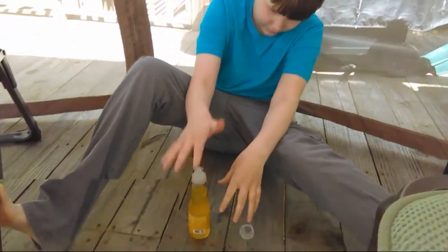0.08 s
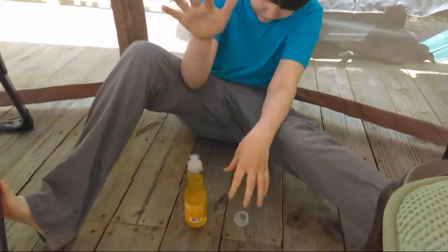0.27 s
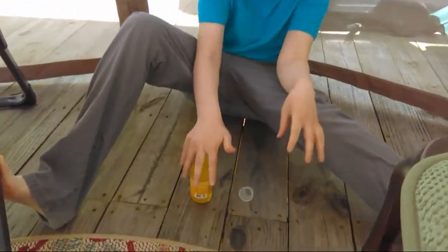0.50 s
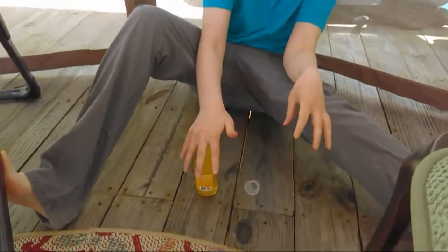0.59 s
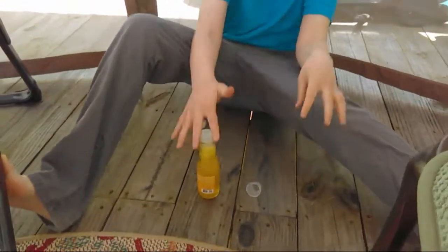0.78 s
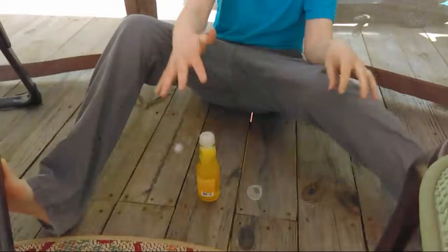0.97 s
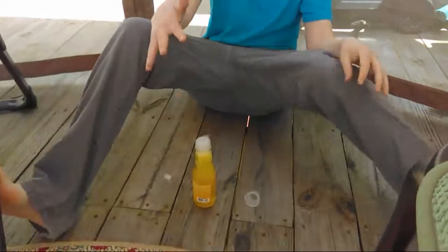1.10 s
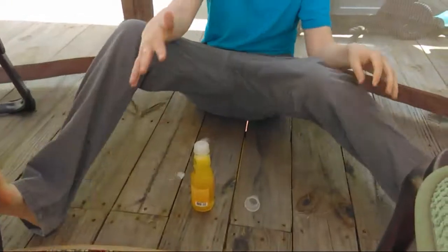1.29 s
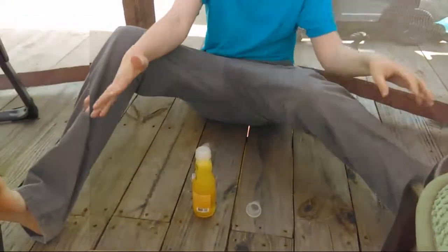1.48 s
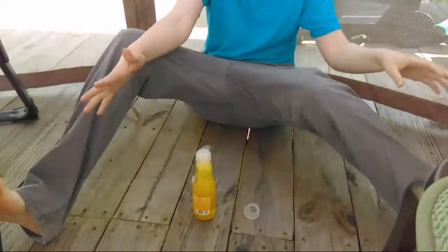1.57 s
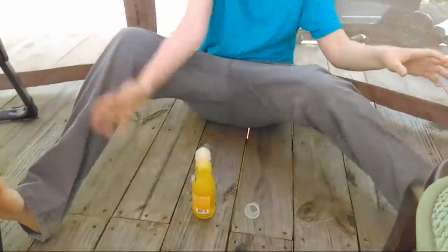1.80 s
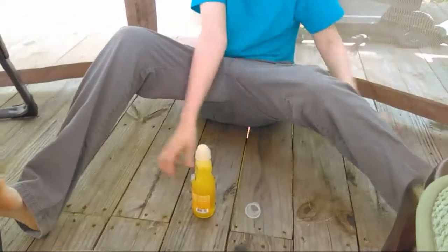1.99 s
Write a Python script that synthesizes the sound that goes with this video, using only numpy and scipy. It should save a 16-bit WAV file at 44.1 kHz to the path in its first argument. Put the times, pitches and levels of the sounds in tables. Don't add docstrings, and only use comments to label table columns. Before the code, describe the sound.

Close up on a quiet wooden porch, a stopper cracks loose in a soda bottle with a knock on the boards and a bright spurt of gas, followed by bubbling fizz, small clicks, scuffs and faint leaks.

```python
import sys
import numpy as np
from scipy import signal
from scipy.fft import rfft, irfft, next_fast_len
from scipy.io import wavfile
from scipy.ndimage import map_coordinates

SR = 44100
rng = np.random.default_rng(int(sys.argv[2]) if len(sys.argv) > 2 else 0)


def wav_out(sig):
    wavfile.write(sys.argv[1], SR, np.round(np.clip(np.atleast_2d(sig).T, -1, 1) * 32767).astype(np.int16))


def undo_db(level):
    steps = np.asarray(level, float) / 20
    return 10 ** steps


N = 88200

# (pitch [Hz], density [dB per Hz])
AIR_TONE = [(25, -14.5), (100, 3.5), (270, -1), (450, -6), (1000, -9), (2000, -19), (2900, -17),
            (4500, -30), (7000, -37)]
AIR_DB, HISS_DB = -65.5, -80.5

PORCH_DB, PORCH_T60_S = -16.5, 0.1983

# (time [s], length [s], level [dB], pitch [Hz])
HUMS = [(.34, 0.074, -54.5, 185), (.38, .11, -49, 150), (0.394, .08, -56, 205), (0.356, .06, -58, 500),
        (0.423, 0.11, -57, 610), (.48, .125, -50, 150), (.57, 0.096, -52, 205), (.585, .13, -54.5, 150.4),
        (0.601, 0.076, -61.5, 545), (.66, .1, -60.5, 205), (0.49, 0.077, -60.5, 700),
        (0.318, 0.079, -56, 810), (.48, .1, -59, 205), (.72, .09, -62, 150), (.83, .08, -62, 150)]

# (time [s], level [dB])
BOOM_LEVEL = [(.25, -46), (.33, -53.5), (.42, -55.5), (.49, -55.5), (.63, -57), (.72, -61.5), (.82, -62),
              (.9, -64), (1.4, -72)]
# (pitch [Hz], width [Hz], level [dB])
BOARD_PEAKS = [(114.1, 41, -4.5), (142, 18, 4), (209.9, 36, -0.5), (431, 86, -7), (573, 50, -5),
               (785, 45, -8)]

# (time [s], level [dB])
FOAM_LEVEL = [(0, -71.5), (.2, -70.5), (.31, -56.5), (.375, -47), (.43, -54), (.49, -61.5), (.52, -55),
              (.63, -58), (.9, -66.5), (1.0, -58.5), (1.07, -64), (1.13, -69), (1.33, -71.5), (1.6, -71),
              (1.66, -64), (1.75, -69.5), (1.81, -76), (2, -70.5)]
# (pitch [Hz], density [dB per Hz])
FOAM_TONE = [(450, -7.5), (800, -0.5), (1600, -3), (2550, -0.5), (3700, -10), (4300, -16.5), (6000, -37)]
BUBBLES_PER_S, BUBBLE_HZ, BUBBLE_CYCLES, BUBBLE_DB = 500, 2400, 15, -10.5
# (pitch [Hz], density [dB per Hz])
SPRAY_TONE = [(3000, -12.5), (4500, 6), (6800, 0), (8500, 1), (11500, -23), (15500, -19)]
SPRAY_DB, SPRAY_GROWS = -57, 1.213

WHEEZE_S, WHEEZE_HOLD_S, WHEEZE_DB, WHEEZE_HZ = 1.19, 0.2, -71, 3500
WHEEZE_SAG_HZ_PER_S, WHEEZE_SETTLE_S = 6200, 0.12

# (time [s], length [s], level [dB], rise [s], top-end level [dB])
LEAKS = [(0.501, 0.022, -68, .002, -22), (0.579, 0.025, -70, 0.0034, -17.5),
         (.622, .004, -69, 0.0012, -16.5), (.665, 0.081, -71.5, 0.0018, -25),
         (0.741, 0.012, -58, 0.0017, -12), (0.779, 0.026, -66, .002, -9),
         (0.837, 0.012, -63.5, 0.0022, -12), (0.923, 0.024, -66.5, 0.0017, -18),
         (0.956, 0.075, -68.5, 0.0079, -21.5), (1.199, 0.015, -69, .003, -11.5),
         (1.429, 0.15, -77.5, 0.042, -12), (1.594, .15, -74, 0.041, -13), (1.77, 0.14, -80, .03, -6.5),
         (1.935, 0.014, -73.5, 0.0037, -10.5)]
# (time [s], length [s], level [dB], top-end level [dB])
SPURTS = [
    (.262, 0.04, -49.5, -2),
    (0.306, 0.034, -59, -9),
    (0.346, .045, -64, -16),
    (.39, .04, -69, -17),
]
# (pitch [Hz], density [dB per Hz])
LEAK_TONE = [(4000, -14), (7400, -13), (8200, -1), (9300, 1), (10500, -4), (11500, -9.5), (12400, -22.5)]
LEAK_T60_S, SPURT_T60_S = 0.19, 0.04

# (time [s], length [s], level [dB], fade by 60 dB [s], top pitch [Hz])
SCUFFS = [
    (.085, 0.011, -62, .05, 3300),
    (0.8327, .012, -51, .05, 5200),
    (.855, .016, -57, .04, 4800),
    (.873, .008, -63, .025, 4200),
    (.9865, .008, -58, .08, 4300),
    (1.288, .004, -65, .03, 5500),
]
# (pitch [Hz], density [dB per Hz])
SCUFF_TONE = [(600, -7.5), (900, -1), (1600, -4), (2500, 0.5), (3600, -4), (4700, -5.5), (5400, -30)]

# (time [s], level [dB], pitch
# [Hz], fade by 60 dB [s])
TAPS = [(.0875, -66, 2600, .05), (.085, -63, 1260, .012), (.253, -31.5, 2800, .05),
        (.2778, -33, 2100, 0.02), (.2865, -39, 2100, .025), (.326, -49, 2710, .1), (.504, -58, 2390, .05),
        (.8347, -37, 2227, .018), (.8352, -44, 3420, .012), (.8358, -51, 4600, .011),
        (.835, -57, 1487, .02), (.846, -56, 1054, .03), (.842, -52, 1900, .03), (.862, -55, 2700, .03),
        (.894, -63, 2000, .04), (.987, -54, 1656, 0.056), (.9865, -59, 800, .09), (.951, -78, 5200, .3),
        (1.083, -62, 1600, .05), (1.2074, -66, 2250, .04), (1.1, -62, 2350, .04), (1.288, -73, 3650, .02),
        (1.64, -71.5, 2800, 0.48), (1.665, -72, 2300, .4), (1.7, -66, 2400, .25), (1.976, -67.5, 3800, .12)]
TAP_WIDTH, TAP_BROAD_DB, TAP_TREBLE_DB, TAP_RING_DB = 0.17, -11, -20.5, 4

# (time [s], level [dB])
JET_FLOW = [(.2035, -41), (.207, -24), (.222, -20.5), (.244, -24), (.258, -29), (.266, -40), (.285, -43),
            (.312, -53.5), (.4, -72), (.47, -77.5)]
# (pitch [Hz], density [dB per Hz])
JET_TONE = [(380, -23.5), (700, -10), (1490, -14), (2790, -3), (3400, -8), (6800, -11), (8450, -1),
            (16000, -17)]
# (pitch [Hz], width [Hz], level [dB])
NECK_PEAKS = [(8500, 380, 3), (9500, 700, 4), (10740, 1200, -0.5), (14000, 3700, -12)]
# (pitch [Hz], width [Hz], level [dB])
SUNK_NECK_PEAKS = [(8100, 500, 6), (9300, 700, -0.5), (11200, 1200, -1.5), (14000, 3000, -10.5)]
SINK_S, SINK_OVER_S = 0.225, 0.02

# (time [s], level [dB], pitch [Hz], fade by 60 dB [s])
BLOWS = [(0.1934, -25, 355.2, 0.15), (0.195, -30, 229.7, 0.21), (.2010, -25.5, 368, 0.075),
         (.2030, -27, 620, 0.07), (.2120, -29.5, 740, 0.059), (.2060, -27.5, 115.7, 0.22),
         (.2370, -17.5, 331.5, 0.048), (0.25, -30.5, 141, 0.087), (.2610, -29, 387, 0.023),
         (0.282, -56, 175, 0.033)]
PUSH_DB, PUSH_T60_S = 2.5, 0.022

# (pitch [Hz], level [dB], fade by 60 dB [s])
GLASS_MODES = [(1355, -1, .05), (1478, -4, .04), (2370, -6, .04), (2794, -7, .05), (4860, -7, .05),
               (6099, -8, .04), (8670, -8, .07), (8430, -9.5, .07), (8260, -9, .07), (9510, -9, .06),
               (10200, -12, .04)]
GLASS_DB = -11

# (time [s], level [dB], fade by 60 dB [s], treble level [dB])
CRACKS = [
    (0.192, -32.5, 0.065, -1),
    (0.2016, -25, 0.04, -12.5),
    (0.2031, -17, 0.015, 1),
    (0.2054, -11.5, 0.012, 1.5),
    (0.2076, -12.5, 0.012, -2.5),
    (0.2137, -13.5, 0.016, -6.5),
    (0.218, -26, 0.06, 0),
    (.2310, -27.5, 0.026, -1.5),
    (0.24, -32, 0.02, 1.5),
    (0.2779, -30.5, 0.015, 0),
]
# (pitch [Hz], width [Hz], level [dB])
PLASTIC_PEAKS = [(646, 220, -3), (1050, 300, -7.5), (1520, 390, 1), (2400, 440, -1), (2930, 400, 0),
                 (4820, 980, -11), (5890, 690, -6)]

TOP_HZ, LOW_CUT_HZ = 15800, 52


def unit(x):
    return x / np.sqrt(np.mean(x ** 2) + 1e-20)


def filtered(x, response):
    size = next_fast_len(len(x) + SR // 2)
    hz = np.fft.rfftfreq(size, 1 / SR)
    return irfft(rfft(x, size) * response(hz), size)[:len(x)]


def shape(points):
    hz, db = np.transpose(points)
    return lambda f: undo_db(np.interp(np.log(f + 1), np.log(hz + 1), db, -120, -120))


def peaks(table):
    def response(f):
        total = 0
        for k, (hz, width, db) in enumerate(table):
            total = total + (-1) ** k * undo_db(db) * 1j * f * width / (hz * hz - f * f + 1j * f * width)
        return total
    return response


def noise(response, size=N):
    return unit(filtered(rng.standard_normal(size), response))


def wobble(rate):
    return map_coordinates(rng.standard_normal(200), [np.arange(N) * rate / SR])


def curve(rows):
    s, db = np.transpose(rows)
    return undo_db(np.interp(np.arange(N) / SR, s, db, -120, -120))


def burst(s, t60, hold=0., rise=.0006):
    t = np.arange(N) / SR - s
    live = slice(*np.searchsorted(t, [0, hold + 2 * t60]))
    out = np.zeros(N)
    fade = undo_db(-60 * np.maximum(t[live] - hold, 0) / t60)
    out[live] = (1 - np.exp(-t[live] / rise)) * fade
    return out


def ring(s, hz, t60, rise=.0006, phase=0.):
    return burst(s, t60, rise=rise) * np.sin(2 * np.pi * hz * (np.arange(N) / SR - s) + phase)


def outdoor_air():
    rumble = undo_db(AIR_DB) * undo_db(wobble(6)) * noise(shape(AIR_TONE))
    hiss = noise(shape([(3000, -5), (7000, -5), (9000, 4.5), (12000, -1), (16500, -2.5)]))
    return rumble + undo_db(HISS_DB) * hiss


def porch_echo(x):
    tail = rng.standard_normal(N) * burst(0.016, PORCH_T60_S)
    return signal.fftconvolve(x, tail / np.linalg.norm(tail))[:N]


def board_hums():
    t = np.arange(N) / SR
    unsteady = t + np.cumsum(wobble(15)) / (150 * SR)
    out = np.zeros(N)
    for s, length, db, hz in HUMS:
        swell = np.sin(np.pi * np.clip((t - s) / length, 0, 1))
        out += undo_db(db) * swell * np.sin(2 * np.pi * hz * unsteady)
    return out


def board_boom():
    return curve(BOOM_LEVEL) * noise(peaks(BOARD_PEAKS))


def bubble_pops():
    draw = rng.random((BUBBLES_PER_S * 2, 3))
    hz = BUBBLE_HZ * np.exp(.9 * (draw[:, 1:2] - .5))
    t = np.arange(300) / SR
    loudness = undo_db(-3 * np.log(draw[:, 2:] + 0.017))
    swell = np.exp(-t * hz / BUBBLE_CYCLES) * (1 - np.exp(-t * hz))
    grains = loudness * np.sin(2 * np.pi * hz * t) * swell
    at = (draw[:, :1] * N).astype(int) + np.arange(300)
    return unit(np.bincount(at.ravel(), grains.ravel(), N + 300)[:N])


def foam():
    flow = curve(FOAM_LEVEL)
    fizz = flow * (noise(shape(FOAM_TONE)) + undo_db(BUBBLE_DB) * bubble_pops())
    spray = undo_db(SPRAY_DB) * (flow / flow.max()) ** SPRAY_GROWS * noise(shape(SPRAY_TONE))
    return undo_db(0.43 * wobble(25)) * (fizz + spray)


def wheeze():
    t = np.maximum(np.arange(N) / SR - WHEEZE_S, 0)
    fall = 1 - np.exp(-t / WHEEZE_SETTLE_S)
    hz = WHEEZE_HZ - WHEEZE_SAG_HZ_PER_S * WHEEZE_SETTLE_S * fall
    fuzz = noise(lambda f: 1 / (1 + (f / 170) ** 4))
    swell = burst(WHEEZE_S, 0.12, WHEEZE_HOLD_S, rise=0.025)
    return undo_db(WHEEZE_DB) * swell * fuzz * np.sin(2 * np.pi * np.cumsum(hz) / SR)


def leaks():
    hiss = noise(shape(LEAK_TONE))
    top = noise(shape([(11500, 0), (12500, -2.5), (15900, -4.5)]))
    out = np.zeros(N)
    for s, hold, db, rise, top_db in LEAKS:
        out += undo_db(db) * burst(s, LEAK_T60_S, hold, rise) * (hiss + undo_db(top_db) * top)
    for s, hold, db, top_db in SPURTS:
        out += undo_db(db) * burst(s, SPURT_T60_S, hold) * (hiss + undo_db(top_db) * top)
    return out * undo_db(0.97 * wobble(51))


def scuffs():
    out = np.zeros(N)
    for s, hold, db, t60, top_hz in SCUFFS:
        rustle = noise(lambda f: shape(SCUFF_TONE)(f) / (1 + (f / top_hz) ** 12))
        out += undo_db(db) * burst(s, t60, hold, 0.0011) * rustle
    return out


def taps():
    neck = undo_db(TAP_TREBLE_DB) * noise(shape(LEAK_TONE))
    out = np.zeros(N)
    for s, db, hz, t60 in TAPS:
        body = peaks([(hz, hz * TAP_WIDTH, 0), (hz * 1.3, hz, TAP_BROAD_DB)])
        rough = noise(lambda f: body(f) / (1 + (f / 5300) ** 10))
        knock = burst(s, t60, 0.0023) * (rough + neck)
        out += undo_db(db) * (knock + undo_db(TAP_RING_DB) * ring(s, hz, t60 * 1.6))
    return out


def jet():
    sunk = np.clip((np.arange(N) / SR - SINK_S) / SINK_OVER_S, 0, 1) * np.pi / 2
    whistle = np.cos(sunk) * noise(peaks(NECK_PEAKS)) + np.sin(sunk) * noise(peaks(SUNK_NECK_PEAKS))
    rush = noise(shape(JET_TONE))
    return unit(rush + whistle) * curve(JET_FLOW) * undo_db(-2 + 2.6 * wobble(95))


def blows():
    out = np.zeros(N)
    for s, db, hz, t60 in BLOWS:
        push = undo_db(PUSH_DB) * ring(s, hz / 3, PUSH_T60_S, rise=0.0022)
        out += undo_db(db) * (ring(s, hz, t60, rise=0.001) + push)
    return out


def glass():
    out = np.zeros(N)
    for s, db, *_ in CRACKS[3:6]:
        for hz, mode_db, t60 in GLASS_MODES:
            level = undo_db(db + GLASS_DB + mode_db + rng.normal(0, 1))
            out += level * ring(s, hz, t60, phase=2 * np.pi * rng.random())
    return out


def cracks():
    body, bright = noise(peaks(PLASTIC_PEAKS)), noise(peaks(NECK_PEAKS))
    out = np.zeros(N)
    for s, db, t60, treble_db in CRACKS:
        out += undo_db(db) * burst(s, t60) * (body + undo_db(treble_db) * bright)
    return out


def scene():
    hits = scuffs() + taps() + glass() + cracks()
    background = outdoor_air() + undo_db(PORCH_DB) * porch_echo(hits) + board_hums() + board_boom()
    bottle = foam() + wheeze() + leaks() + jet()
    return (background + bottle + blows() + hits)[None]


def roll_off(x):
    return signal.sosfilt(signal.butter(12, 16790, fs=SR, output="sos"), x)


def record(dry):
    def microphone(hz):
        treble_edge = np.clip((TOP_HZ - hz) / 250 + .5, .12, 1) ** 2
        low_cut = (1j * hz / (LOW_CUT_HZ + 1j * hz)) ** 3
        return treble_edge * low_cut
    mix = filtered(dry[0], microphone)[None]
    return roll_off(mix)


dry = scene()
out = record(dry)
wav_out(out)
```